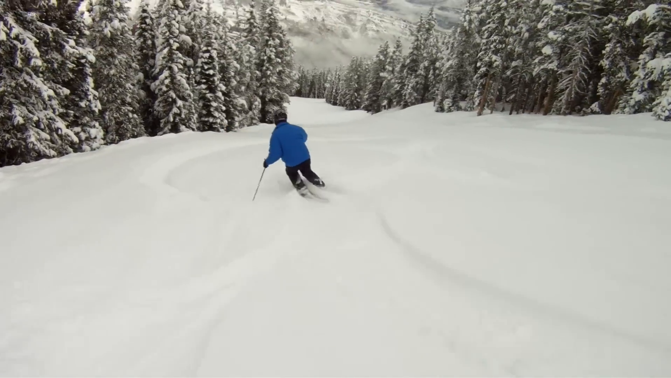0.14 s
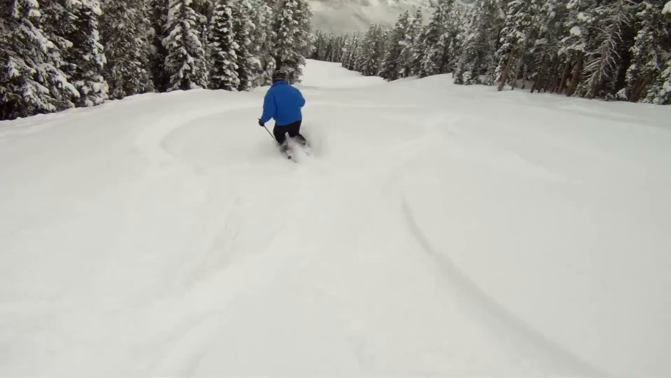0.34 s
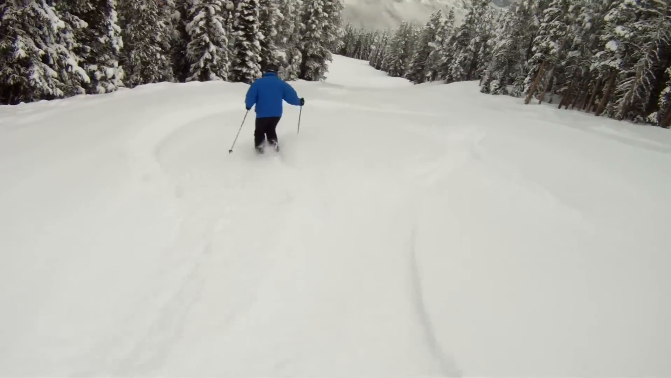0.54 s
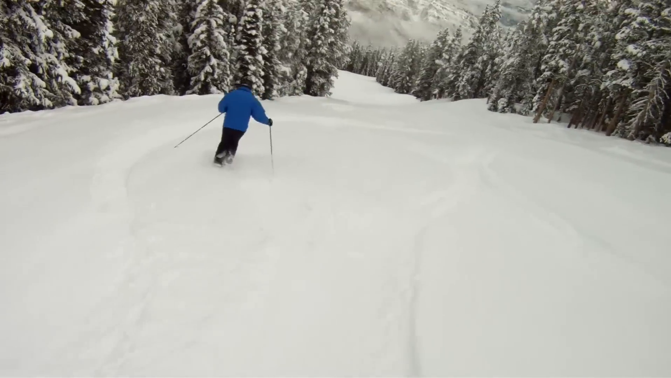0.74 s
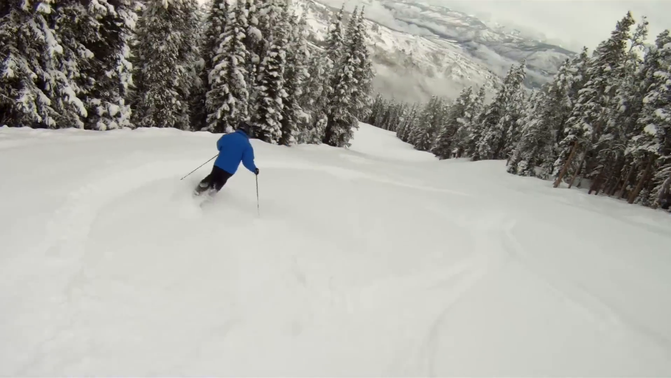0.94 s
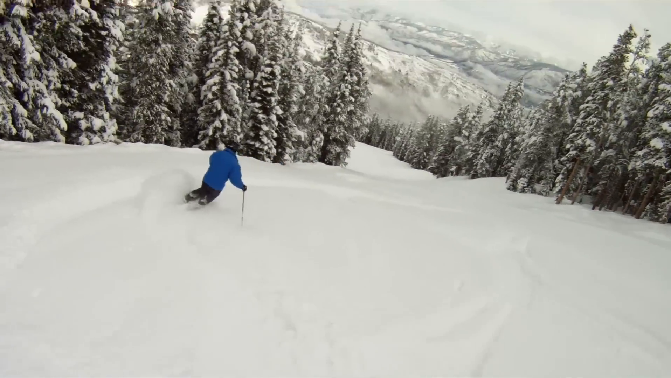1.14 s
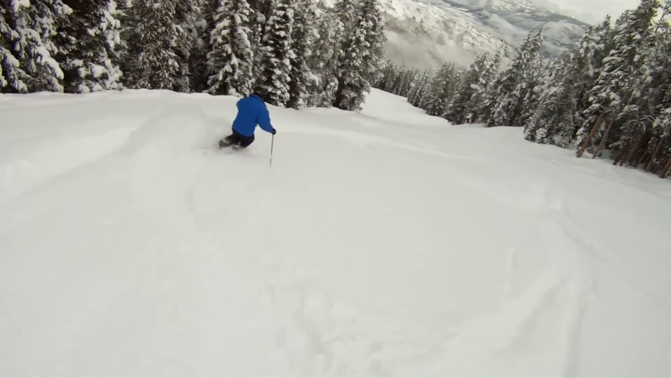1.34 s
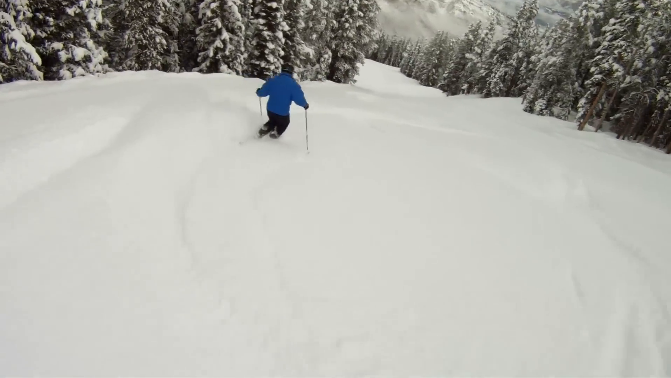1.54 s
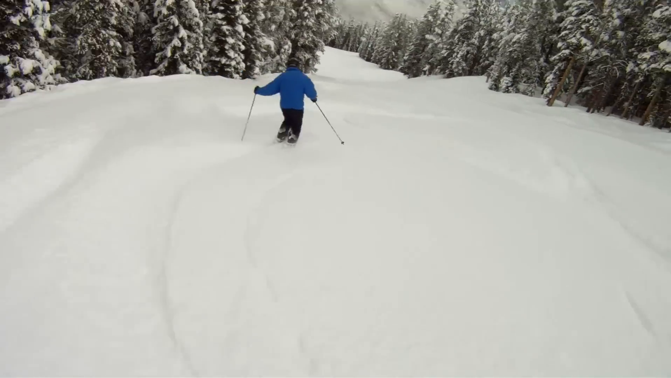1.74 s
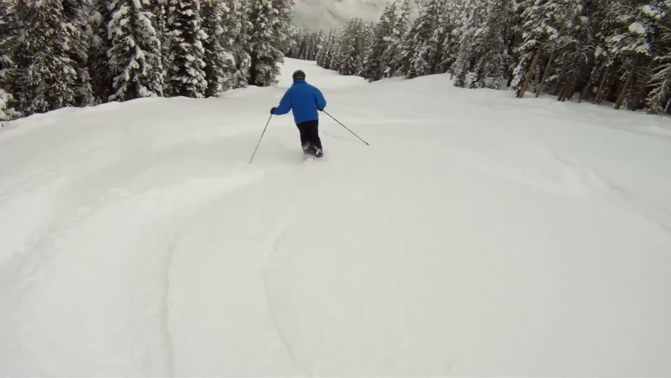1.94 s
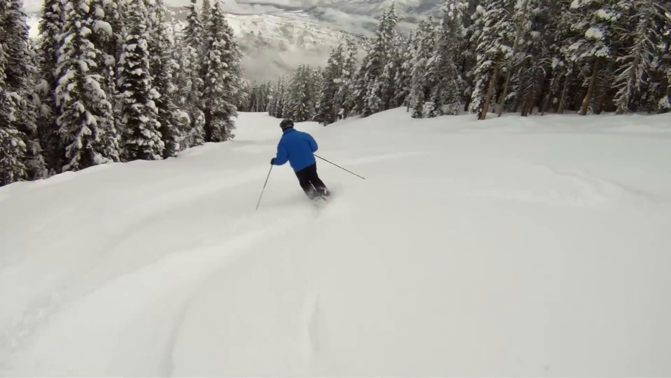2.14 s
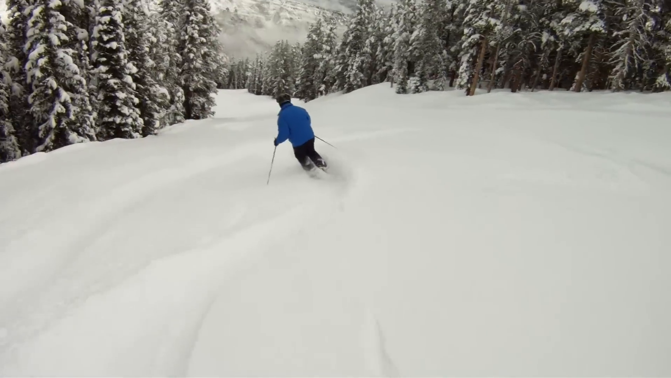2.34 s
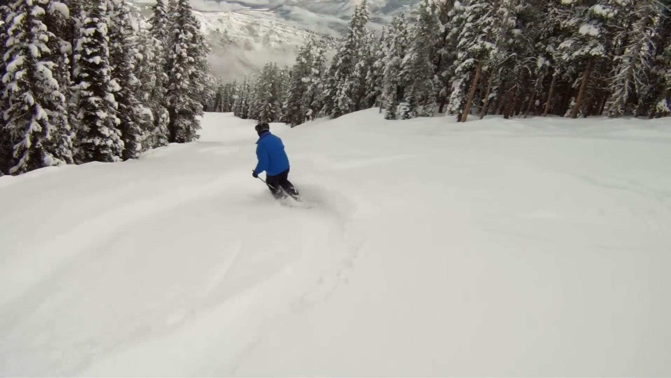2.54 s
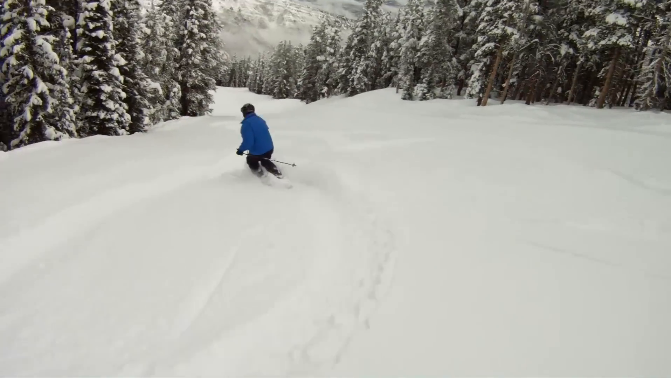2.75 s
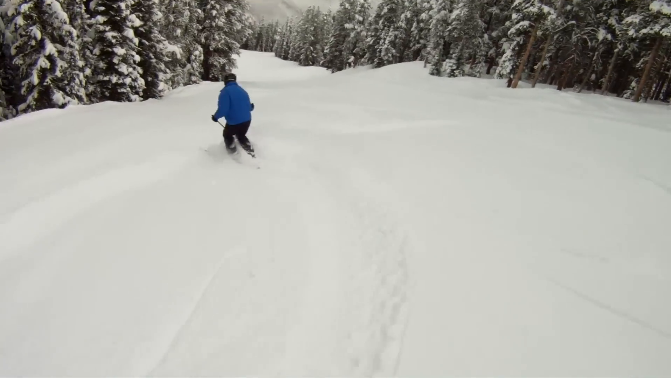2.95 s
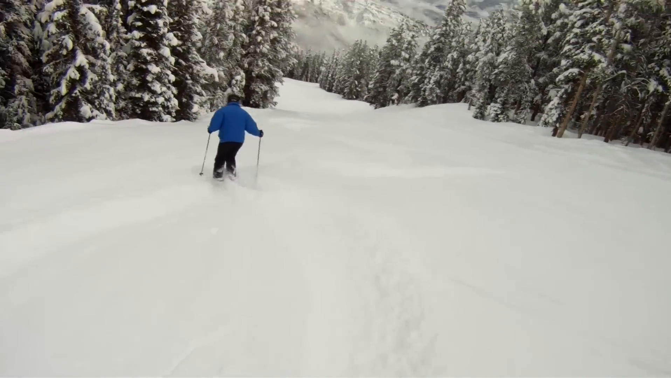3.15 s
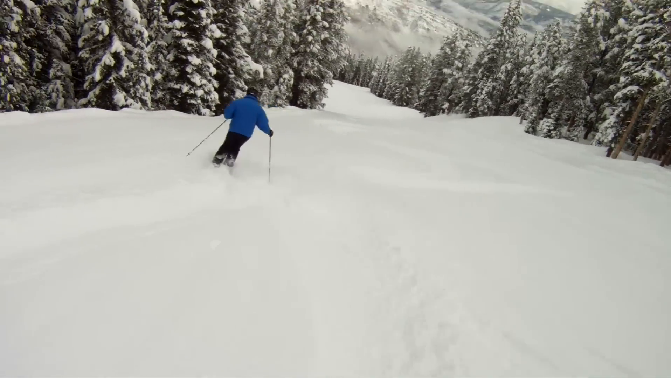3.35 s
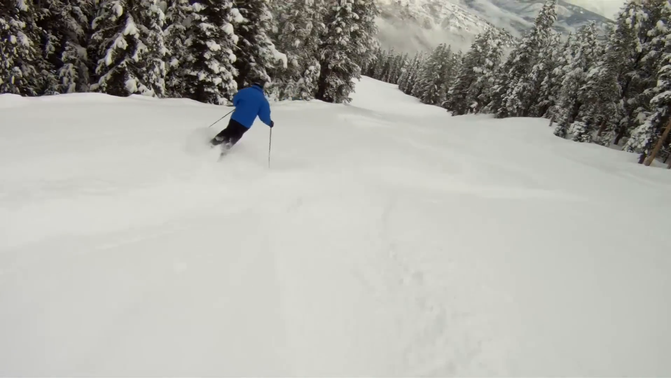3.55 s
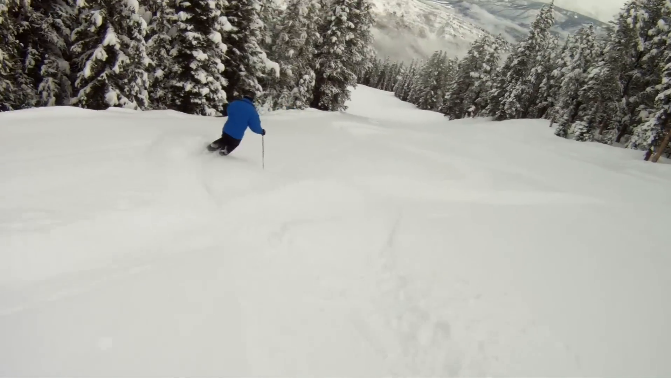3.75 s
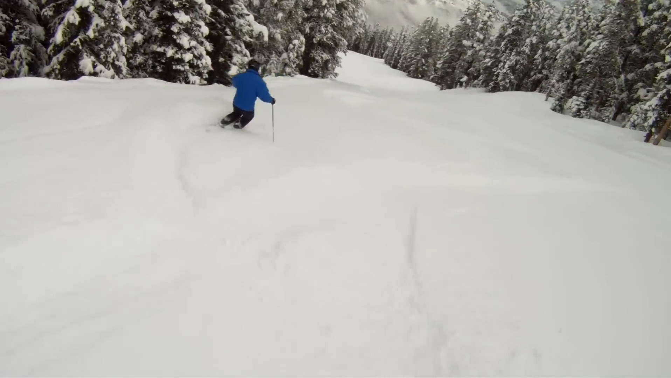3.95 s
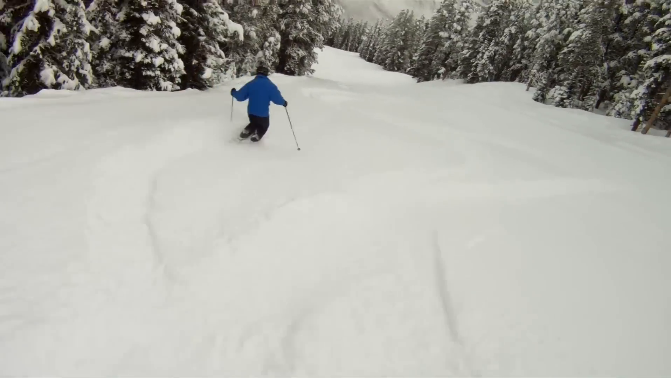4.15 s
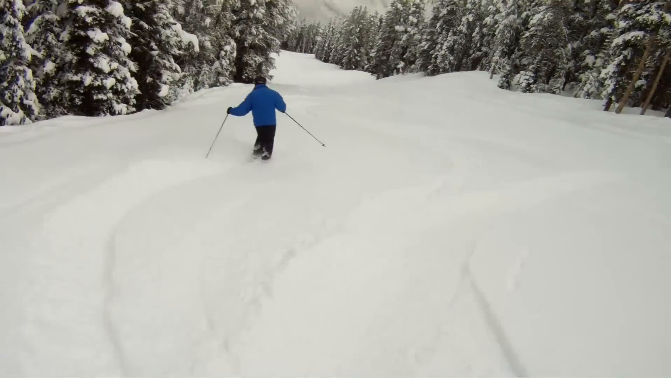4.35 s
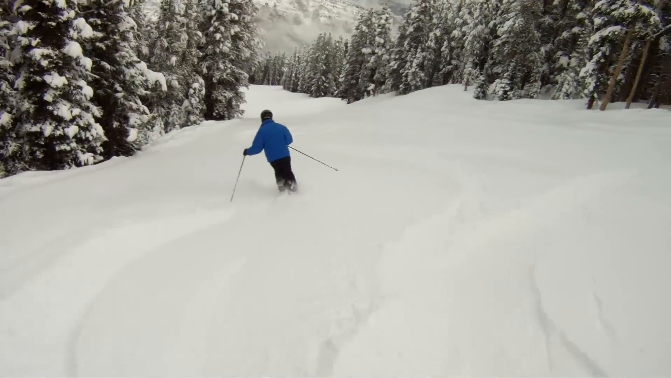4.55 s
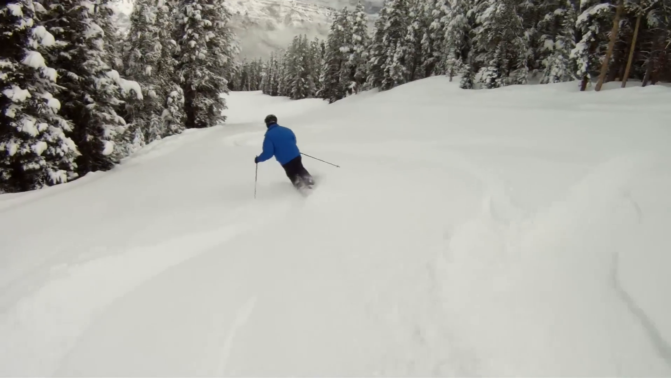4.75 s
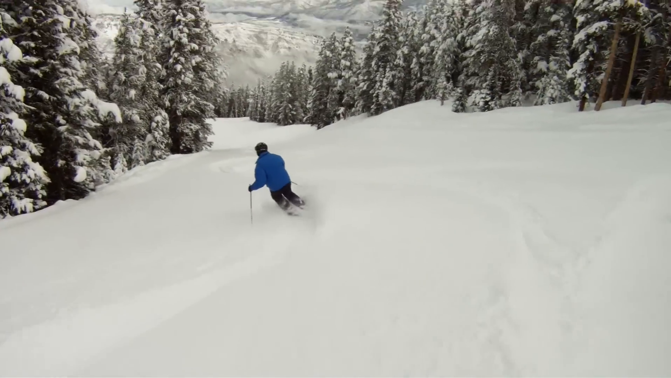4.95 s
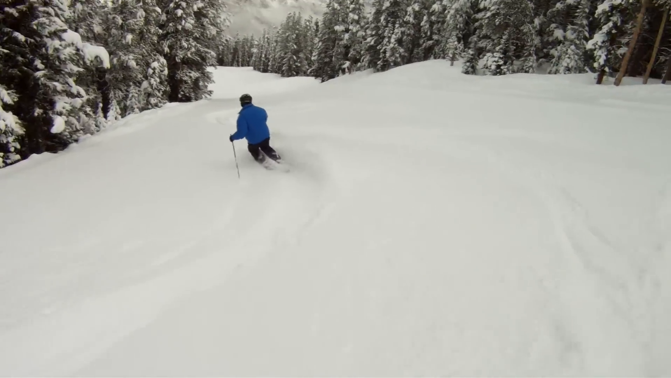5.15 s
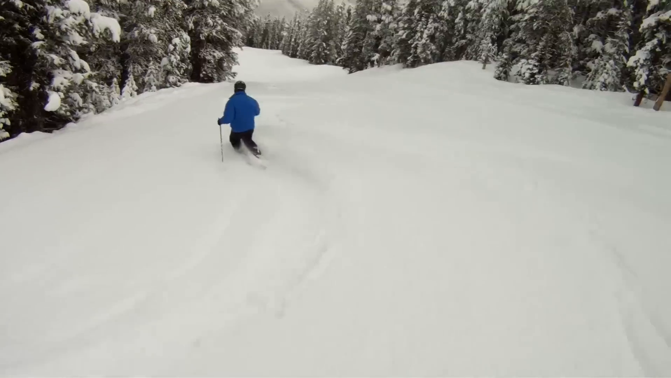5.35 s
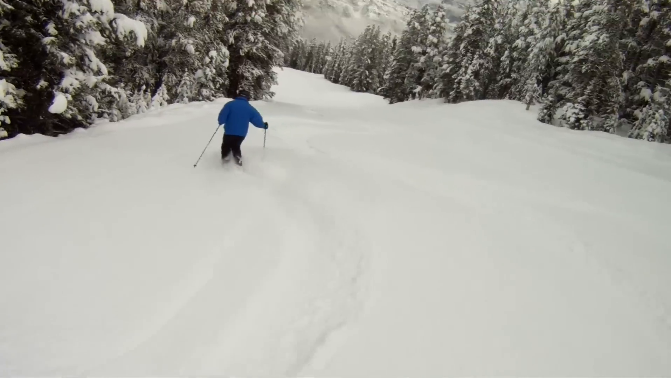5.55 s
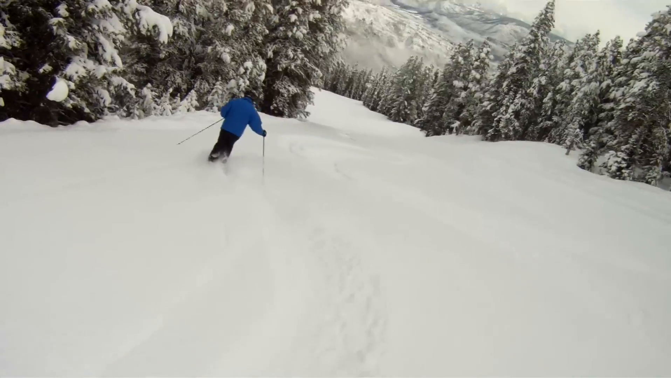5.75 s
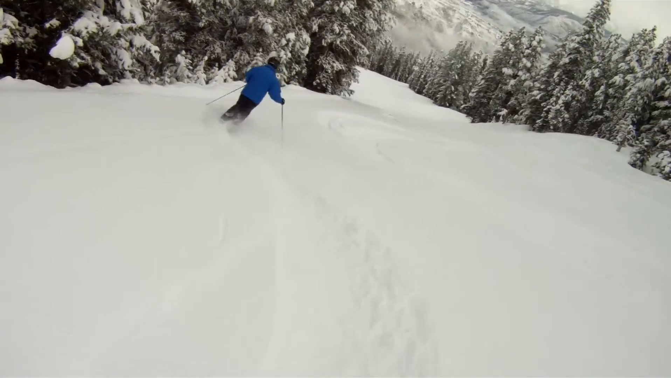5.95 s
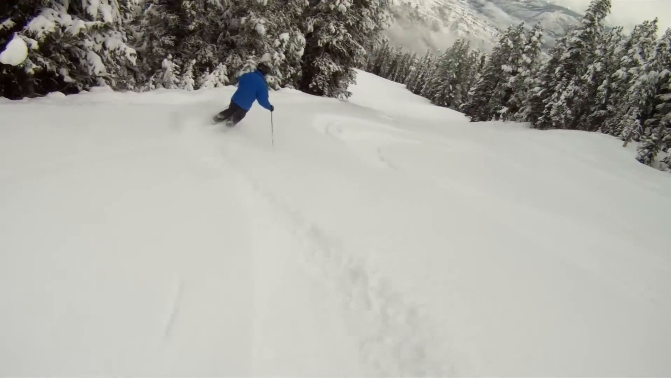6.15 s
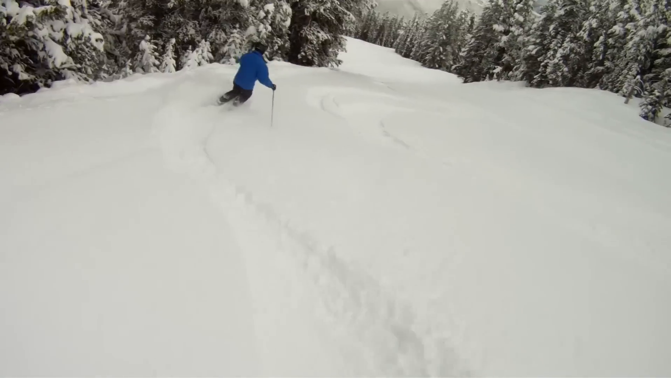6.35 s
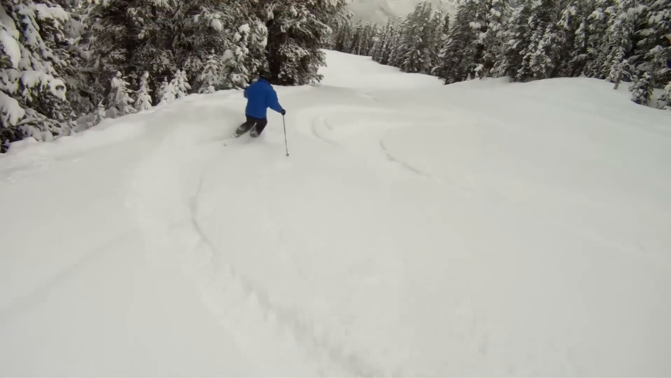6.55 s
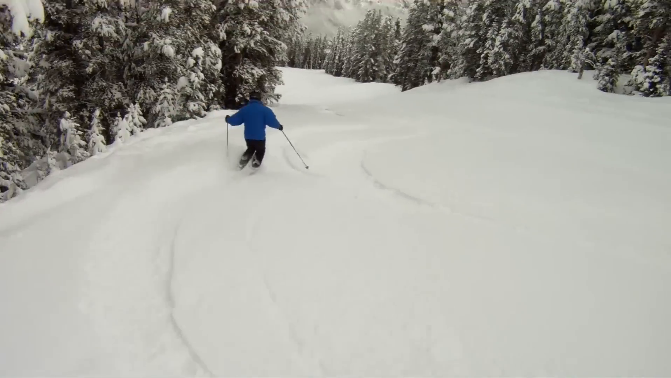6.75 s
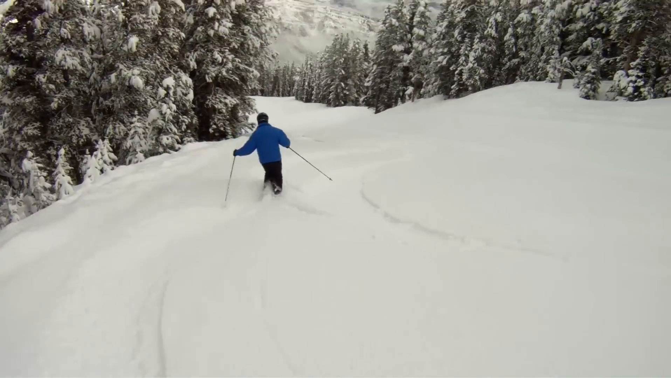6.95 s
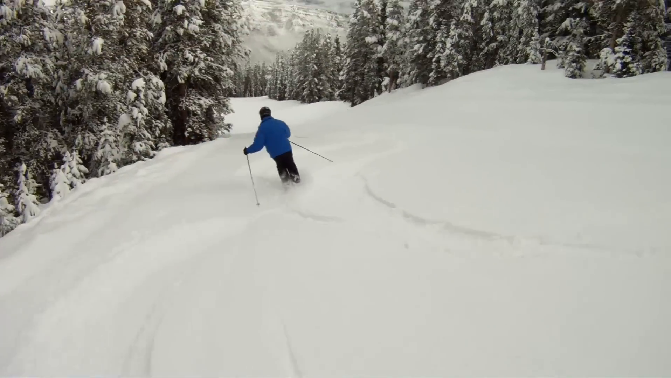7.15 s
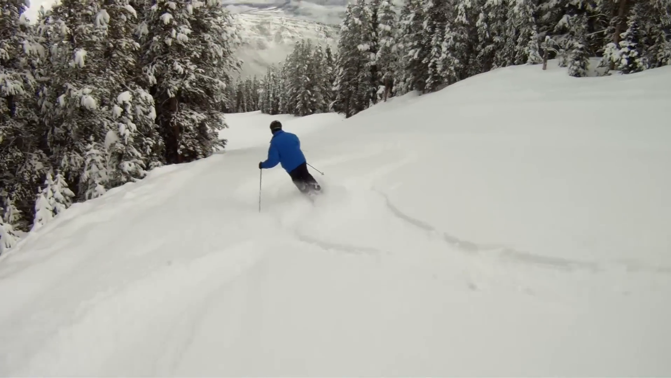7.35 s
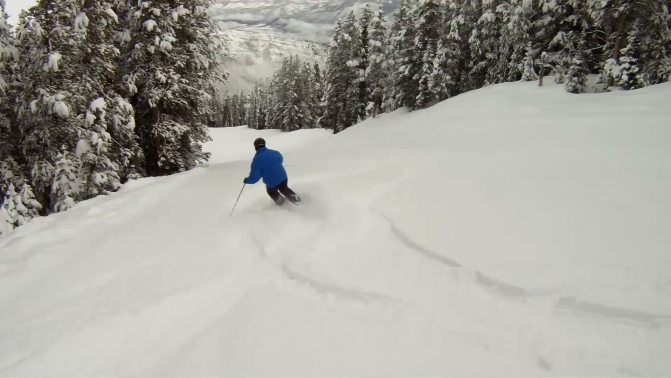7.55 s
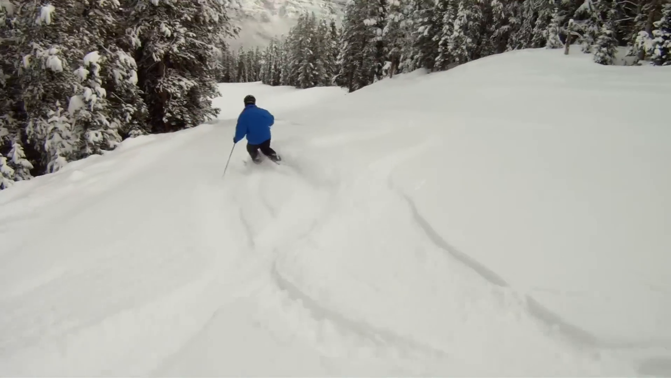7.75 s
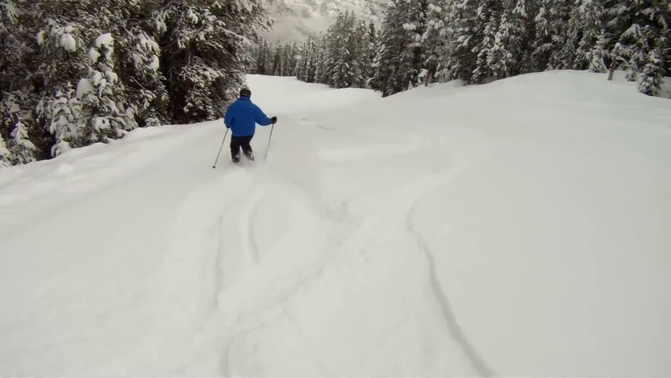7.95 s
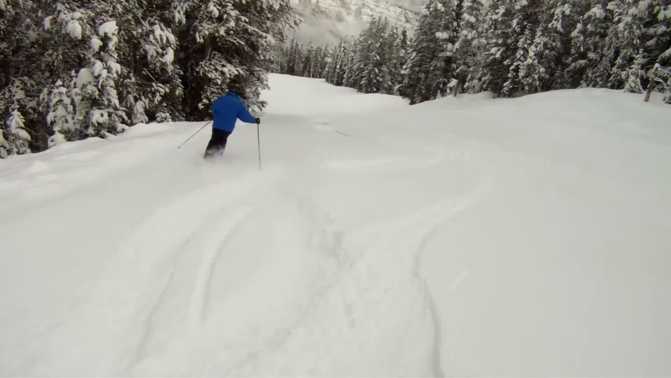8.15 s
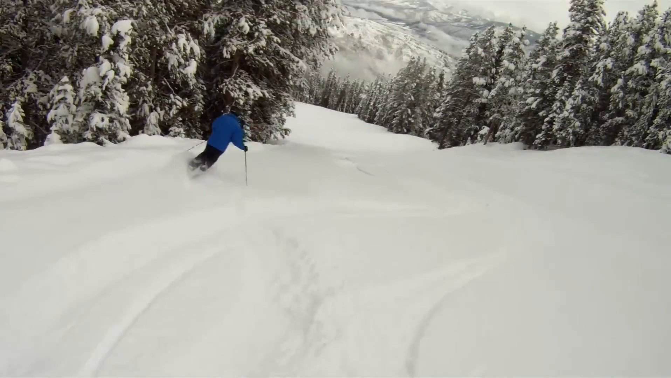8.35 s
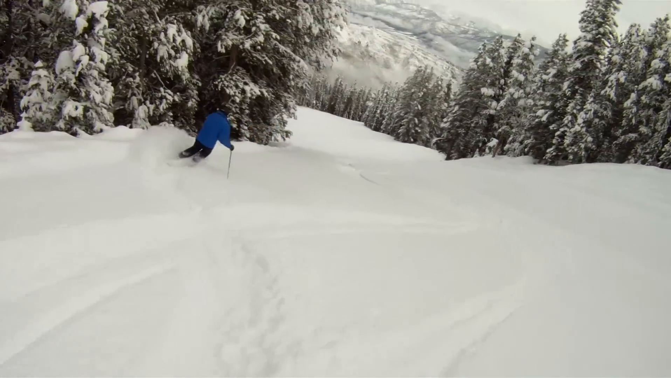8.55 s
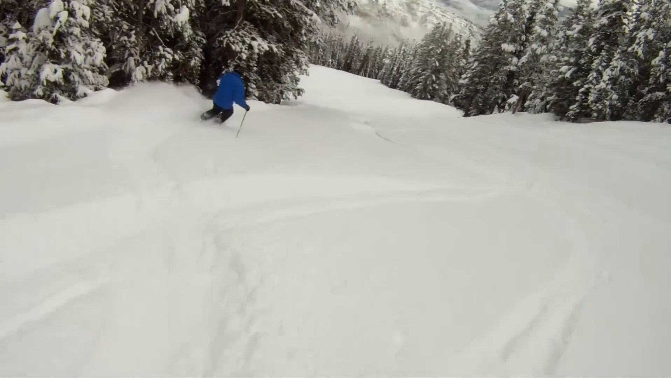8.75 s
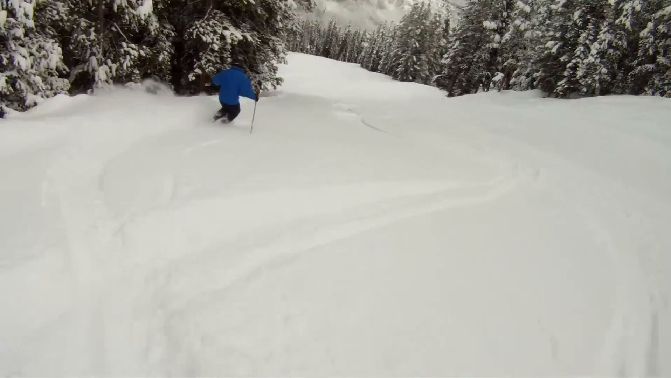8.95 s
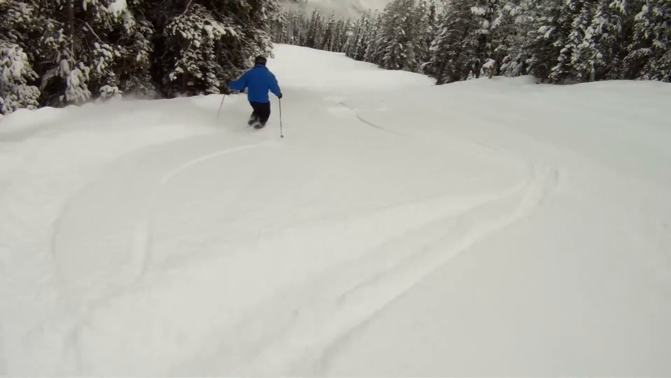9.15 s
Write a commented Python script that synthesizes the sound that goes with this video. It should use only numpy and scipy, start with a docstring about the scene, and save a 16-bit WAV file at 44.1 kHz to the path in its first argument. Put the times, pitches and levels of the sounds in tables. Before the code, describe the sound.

Wind booms on a camera case while skis swish through powder, with plastic knocks and ticks from the mount.

```python
"""Powder snow sprays from carving skis, heard up close from a closed plastic camera case on the skier.
Each turn throws flakes that hiss on one side of the shell, and crumbs of snow burst on it.
Jolts make the case knock and tick on its mount; wind buffets it and booms in the air shut inside.
One microphone sits in the case. The camera samples coarsely, which adds a thin, bright sheen."""
import sys
import numpy as np
from scipy import signal
from scipy.fft import rfft, irfft, next_fast_len
from scipy.io import wavfile
from scipy.ndimage import uniform_filter1d, map_coordinates

SR = 44100
rng = np.random.default_rng(int(sys.argv[2]) if len(sys.argv) > 2 else 0)


def file_out(sig):
    """Save sig as 16-bit WAV at sys.argv[1]."""
    # one column per channel
    cols = np.atleast_2d(sig).T
    # limit, then scale
    lim = np.clip(cols, -1, 1)
    pcm = np.round(lim * 32767).astype(np.int16)
    wavfile.write(sys.argv[1], SR, pcm)


N = 409688

# powder thrown by the skis: start_s, rise_s, hold_s, fall_s, swish_db, grit_over_swish_db, side (0..1)
TURN_SPRAYS = [(-0.05, 0.062, 0.39, 0.15, -49.5, -4.5, 0.12), (0.732, 0.38, 0.25, 0.51, -48.5, -5, 0.78),
               (1.744, 0.14, 0.046, 0.23, -62, -5, 0.8), (2.099, 0.26, 0.17, 0.35, -43.5, -8.5, 0.09),
               (2.547, 0.18, 0.053, 0.16, -49, -4.5, 0.13), (3.605, 0.12, 0.16, 0.44, -54.5, -4.5, 0.97),
               (4.36, 0.074, 0.05, 0.83, -66.5, -7, 0.2), (4.68, 0.24, 0.29, 0.22, -58.5, -9, 0.2),
               (5.637, 0.27, 0.34, 1, -59.5, -7.5, 1), (6.86, 0.38, 0.44, 0.52, -52.5, -10, 0.56),
               (8.344, 0.22, 0.034, 0.87, -51, -9, 0.82)]
# spray landing on side 0 and on side 1 of the case: pitch_hz, level_db
SIDE_0_SPECTRUM = [(100, -27), (400, -15.5), (750, -14.5), (1200, -8), (1500, -17), (2000, -15),
                   (2350, -25), (3250, -23.5), (3700, -19), (4150, -29.5), (4800, -23), (5500, -20.5)]
SIDE_1_SPECTRUM = [(100, -23), (400, -17), (800, -18.5), (1200, -7.5), (1900, -28.5), (2650, -17),
                   (3100, -19), (3550, -26), (4100, -20.5), (5500, -32)]
# resonances of the plastic around the microphone: pitch_hz, width_hz, boost_db
SHELL_MODES = [(217.5, 52, 8), (415, 176, 7), (1252, 220, 8), (2017, 666, 23), (2512, 286, 11),
               (3234, 150, 7), (3453, 140, 9.5), (3740, 190, 9.5), (4540, 180, 4.5), (5000, 320, 10.5),
               (5670, 830, 7.5)]
# crumbs of snow bursting on the shell: start_s, energy_db, t60_s
CRUMB_HITS = [(0.628, -24.5, 0.11), (0.9, -15.5, 0.053), (0.937, -21, 0.029), (1.004, -19.5, 0.022),
              (1.999, -15.5, 0.031), (2.421, -15, 0.021), (4.453, -18.5, 0.065), (4.975, -18.5, 0.013),
              (5.192, -27.5, 0.025), (6.042, -27, 0.018), (6.918, -23, 0.063), (7.71, -29.5, 0.032),
              (8.294, -26.5, 0.03), (8.371, -21, 0.03), (8.404, -15, 0.044), (8.516, -25, 0.015)]
# a crumb's push on the shell: pitch_hz, level_db
CRUMB_SPECTRUM = [(500, -13.5), (1300, -15), (2000, -21.5), (3000, -16), (4200, -4.5), (5500, -10.5)]
# the case hitting its mount: start_s, energy_db, weight (0 light tick .. 1 full knock)
MOUNT_KNOCKS = [(0.011, -6.5, 0.87), (0.505, 6.5, 0.9), (0.541, -18, 0.33), (0.554, -15, 0.8),
                (0.608, -19.5, 0.15), (0.981, -1, 0.21), (1.055, 6, 0.91), (1.061, -2, 0.87),
                (1.363, -9, 0.73), (1.644, -20, 0.25), (1.982, -2.5, 0.88), (2.034, -17.5, 0.72),
                (2.1, -1.5, 0.89), (2.134, -9, 0.52), (2.188, -11, 0.74), (2.881, -15.5, 0.86),
                (3.031, -25.5, 0.27), (3.41, -15, 0.37), (4.432, -10.5, 0.83), (4.507, -16.5, 0.69),
                (4.569, -26, 0.15), (4.618, -14.5, 0.78), (4.679, -17, 0.66), (4.738, -6.5, 0.81),
                (5.778, -14.5, 0.05), (5.783, -6.5, 0.19), (5.97, -13.5, 0.9), (6.901, -11.5, 0.9),
                (7.101, -14.5, 0.79), (7.238, -1, 0.89), (8.389, -2.5, 0.14), (8.453, 10, 0.91),
                (8.46, -6, 0.59), (8.467, -1.5, 0.96), (8.475, -4.5, 0.096), (8.483, -7.5, 1),
                (8.488, -3.5, 0.78), (9.181, -22, 0.51), (9.23, -7.5, 0.78), (9.251, -15, 0.66)]
# a full knock, a light tick and the mount shaking afterwards: pitch_hz, level_db
KNOCK_SPECTRUM = [(60, -21), (130, 4), (180, 4), (270, -4), (600, -8.5), (850, -7), (1200, -22.5),
                  (1550, -7.5), (2000, -12), (2800, -19), (3300, -12.5), (5500, -30)]
TICK_SPECTRUM = [(60, -15), (130, -8.5), (400, -27), (800, -20), (1200, -4.5), (1600, -0.5), (2000, -14),
                 (2500, -19), (3000, -27.5), (5500, -51)]
SHAKE_SPECTRUM = [(60, -26), (120, 5), (200, -11), (400, -7.5), (800, -12.5), (1500, -24.5), (4000, -48.5)]
# hollow ring of a soft knock: pitch_hz, share of the boost
HOLLOW_SHARE = [(700, 0.65), (1150, 0.97), (1700, 0)]
# eddies hitting the case in the turns: start_s, hold_s, level_db
EDDIES = [(-0.12, 0.31, -35), (0.786, 0.066, -34), (1.13, 0.17, -35.5), (2.16, 0.027, -40),
          (2.342, 0.22, -34.5), (3.4, 0.55, -48), (3.81, 0.048, -42), (4.622, 0.38, -41.5),
          (5.586, 0.43, -38), (6.157, 0.036, -38), (6.97, 0.63, -40.5), (7.535, 0.03, -33.5),
          (8.158, 0.2, -36.5), (8.65, 0.087, -37)]
# gusts of headwind: start_s, rise_s, hold_s, fall_s, level_db
HEADWIND_GUSTS = [(1.713, 0.27, 0.3, 0.22, -60.5), (4.35, 0.2, 0.2, 1, -62.5),
                  (5.34, 0.19, 0.42, 0.58, -54.5), (6.61, 0.26, 0.72, 0.45, -54),
                  (8.193, 0.15, 0.38, 1.0, -60)]
# air streaming past the case: pitch_hz, level_db
STREAM_SPECTRUM = [(20, -17.5), (100, 3), (280, -5.5), (500, -11.5), (730, -12), (1050, -11), (1400, -15),
                   (2000, -21), (3500, -22.5), (5500, -27.5)]
# boom of the air shut in the case: pitch_hz, level_db
BOOM_SPECTRUM = [(8, -37.5), (20, -10.0), (30, -5), (42, -0.5), (51, 6), (60, -6.5), (72, -12.5),
                 (90, -20.0), (130, -31.5), (250, -54.5)]
# air drives the shell's low resonances best: pitch_hz, share of the boost
AIR_COUPLING = [(400, 0.68), (2400, 0.083)]
# faster air is brighter: pitch_hz, boost_db
GUST_BRIGHTNESS = [(100, -6.5), (400, -2), (1200, 3), (2100, 8), (3500, -5)]


def powder(glide_db=-73, build_db_per_s=10):
    """Spray builds while the edges hold their pressure and shifts sides from turn to turn."""
    sides = np.array([spray_on_shell(SIDE_0_SPECTRUM), spray_on_shell(SIDE_1_SPECTRUM)])
    # power by side and by swish or grit; a little is left when the skis run flat
    power = np.full((2, 2, N), amp(glide_db) ** 2 / 2)
    for start, rise, hold, fall, swish_db, grit_db, side in TURN_SPRAYS:
        shares = np.outer([1 - side, side], amp([swish_db, swish_db + grit_db]) ** 2)
        power += shares[..., None] * swell(start, rise, hold, fall, build_db_per_s) ** 2
    clumps = amp(1.4 * wobble(rate_hz=45))  # the snow arrives unevenly
    return clumps * (np.sqrt(power) * sides).sum((0, 1))


def spray_on_shell(spectrum, split_hz=2900):
    """Countless flakes and a few grains ring one side of the shell: swish below the split, grit above."""
    flakes = rng.standard_normal(N) + 0.47 * patter(rate_hz=170, spread_db=6.0)
    ring = impulse(lambda hz: along(spectrum, hz) + shell_db(hz))
    hiss = signal.fftconvolve(flakes, ring)[:N]
    swish = filtered(hiss, lambda hz: 1 / (1 + (hz / split_hz) ** 20))
    return np.array([unit(swish), unit(hiss - swish)])


def patter(rate_hz, spread_db):
    """Coarse grains land at random with unequal force, rms 1."""
    size = amp(spread_db * np.minimum(rng.exponential(size=N), 3))
    lands = rng.random(N) < rate_hz / SR
    return unit(lands * size * rng.choice([-1, 1], N))


def shell_db(hz):
    """The boost that the shell's resonances give each frequency."""
    return sum(db / (1 + (2 * (hz - centre) / width) ** 2) for centre, width, db in SHELL_MODES)


def crumbs(hit_t60_s=0.022, shower_db=-5):
    """Each crumb hits the shell and falls apart into a short, uneven shower of grains."""
    out, t = np.zeros(N), np.arange(SR // 10) / SR
    ring = impulse(lambda hz: along(CRUMB_SPECTRUM, hz) + shell_db(hz))
    for start, db, t60 in CRUMB_HITS:
        clumps = np.repeat(rng.uniform(-1.6, 1.6, len(t)), SR // 1000)[:len(t)]  # 1 ms each
        hit = amp(-60 * t / hit_t60_s)
        shower = amp(shower_db + 8.8 * clumps - 60 * t / t60)
        burst = signal.fftconvolve((hit + shower) * rng.standard_normal(len(t)), ring)
        add(out, start, amp(db) * burst / np.linalg.norm(burst))
    return out


def knocks(rebound_s=0.002458, boom_hz=56, boom_rise_s=0.0029, boom_t60_s=0.28, shake_t60_s=0.14):
    """A knock rings the shell and rebounds; heavy ones shake the mount and set the air inside booming."""
    out, t = np.zeros(N), np.arange(SR // 3) / SR
    boom_envelope = amp(-24.5 - 60 * t / boom_t60_s) * (1 - np.exp(-t / boom_rise_s))
    boom = -np.sin(2 * np.pi * boom_hz * t) * boom_envelope
    shake_envelope = amp(-44 - 60 * t / shake_t60_s)
    mount = impulse(lambda hz: along(SHAKE_SPECTRUM, hz))
    for start, db, weight in MOUNT_KNOCKS:
        hollow_db = 2.22 * np.exp(-db / 9)  # softer knocks sound hollower
        drive = lambda hz: weight * along(KNOCK_SPECTRUM, hz) + (1 - weight) * along(TICK_SPECTRUM, hz)
        click = impulse(lambda hz: drive(hz) + hollow_db * along(HOLLOW_SHARE, hz) + shell_db(hz))
        shake = signal.fftconvolve(rng.standard_normal(len(t)) * shake_envelope, mount)
        add(out, start, amp(db) * click)
        add(out, start + rebound_s, 0.19 * amp(db) * click)
        add(out, start, amp(0.57 * db) * weight ** 2 * boom)  # grows more slowly than the click
        add(out, start, amp(db) * weight ** 2 * shake)
    return out


def wind(calm_db=-54.5, stream_db=-59.5):
    """Eddies pump the air in the case into one low boom; the stream rushes above it, swelling in gusts."""
    eddies = [amp(db) * swell(start, 0.16, hold, 0.22) for start, hold, db in EDDIES]
    buffet = together([amp(calm_db)] + eddies)
    gust = together(amp(db) * swell(*timing) for *timing, db in HEADWIND_GUSTS)
    boom = noise(lambda hz: along(BOOM_SPECTRUM, hz))
    swing = np.sqrt(np.abs(uniform_filter1d(boom ** 2, int(0.06 * SR))) + 1e-4)
    boom = unit(boom / swing ** 0.6)  # the pressure swings fairly evenly within a gust
    colour_db = lambda hz: along(STREAM_SPECTRUM, hz) + along(AIR_COUPLING, hz) * shell_db(hz)
    stream = noise(colour_db)
    rush = noise(lambda hz: colour_db(hz) + along(GUST_BRIGHTNESS, hz))
    flutter = amp(1.6 * wobble(rate_hz=25))
    return buffet * boom + flutter * (amp(stream_db) * stream + gust * rush)


def swell(start_s, rise_s, hold_s, fall_s, build_db_per_s=0, depth_db=26):
    """A gain that climbs depth_db in its rise, holds (building up to 1) and sinks as far in its fall."""
    t = np.arange(N) / SR - start_s
    outside = np.maximum(1 - t / rise_s, 0) + np.maximum(t - rise_s - hold_s, 0) / fall_s
    hold_left_s = np.clip(rise_s + hold_s - t, 0, hold_s)
    return amp(-depth_db * outside - build_db_per_s * hold_left_s)


def together(gains):
    """Unrelated swells add in power."""
    return np.sqrt(sum(gain ** 2 for gain in gains))


def amp(db):
    """Decibels to gain."""
    return 10 ** (np.asarray(db) / 20)


def unit(x):
    """Scale to rms 1."""
    return x / np.sqrt(np.mean(x ** 2) + 1e-20)


def along(points, hz):
    """Read (pitch_hz, value) points on a log frequency axis."""
    pitches, values = np.transpose(points)
    return np.interp(np.log(hz + 1), np.log(pitches + 1), values)


def wobble(rate_hz):
    """A smooth random curve with rate_hz knots a second."""
    knots = rng.standard_normal(int(N * rate_hz / SR) + 4)
    return map_coordinates(knots, [np.arange(N) * rate_hz / SR])


def filtered(x, gain):
    """Apply a gain that depends on frequency."""
    size = next_fast_len(N + SR // 2)
    return irfft(rfft(x, size) * gain(np.fft.rfftfreq(size, 1 / SR)), size)[:N]


def noise(level_db):
    """Noise of rms 1 with the spectral shape level_db(hz)."""
    return unit(filtered(rng.standard_normal(N), lambda hz: amp(level_db(hz))))


def impulse(level_db, size=2048):
    """A causal click of energy 1 with the spectral shape level_db(hz)."""
    cepstrum = irfft(np.log(amp(level_db(np.fft.rfftfreq(size, 1 / SR)))))
    cepstrum[1:size // 2] *= 2  # fold to minimum phase
    cepstrum[size // 2 + 1:] = 0
    click = irfft(np.exp(rfft(cepstrum)))
    return click / np.linalg.norm(click)


def add(track, start_s, sound):
    """Mix a sound into the track."""
    span = track[max(0, round(start_s * SR)):][:len(sound)]
    span += sound[:len(span)]


def scene():
    """Out on the slope, everything reaches one microphone inside the case."""
    return (wind() + powder() + crumbs() + knocks())[None]


def record(dry, band_hz=5600, hold_hz=12000, rolloff_hz=15200, top_hz=16500):
    """The camera holds each coarse sample as a step, which mirrors the sound around the hold rate."""
    narrow = filtered(dry[0], lambda hz: 1 / np.sqrt(1 + (hz / band_hz) ** 50))
    coarse = signal.resample_poly(narrow, hold_hz, SR, window=("kaiser", 3))
    steps = signal.resample_poly(np.repeat(coarse, 4), SR, 4 * hold_hz)[:N]
    hiss = amp(-81.0) * rng.standard_normal(N)  # the camera's electronics
    return filtered(steps + hiss, lambda hz: (hz < top_hz) / np.sqrt(1 + (hz / rolloff_hz) ** 90))[None]


dry = scene()
out = record(dry)
file_out(out)
```